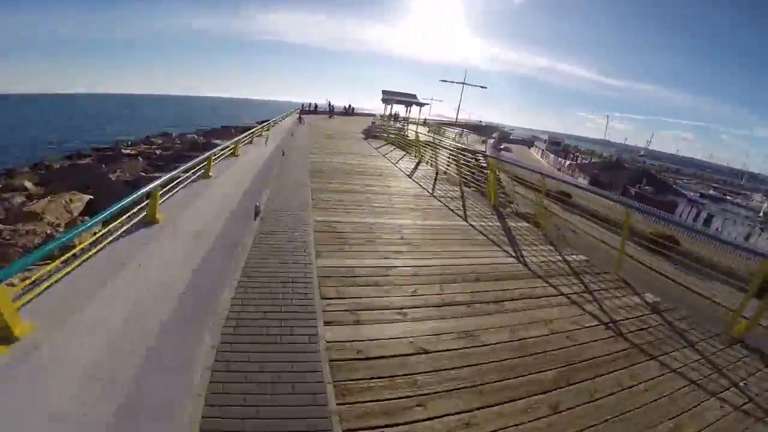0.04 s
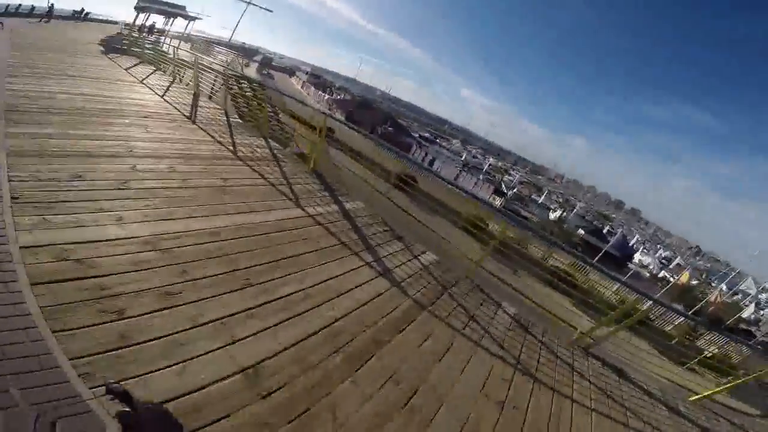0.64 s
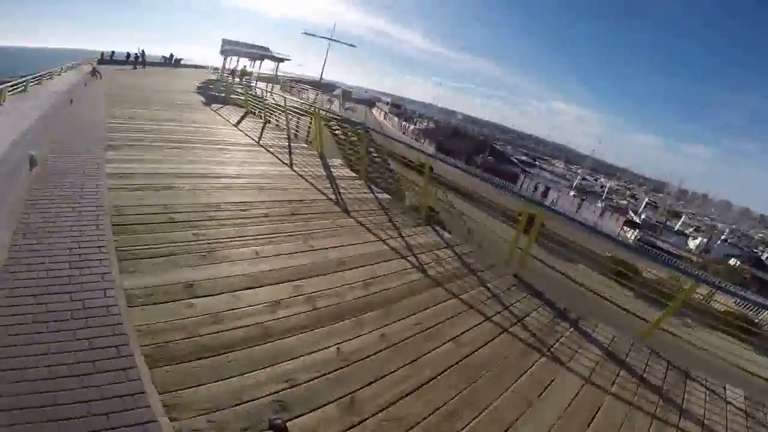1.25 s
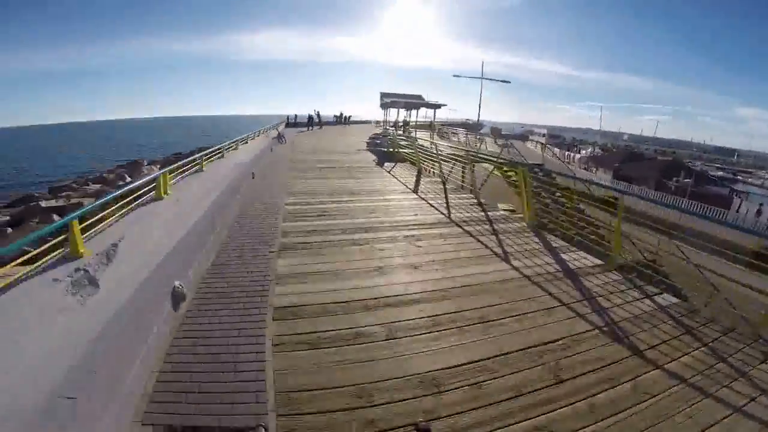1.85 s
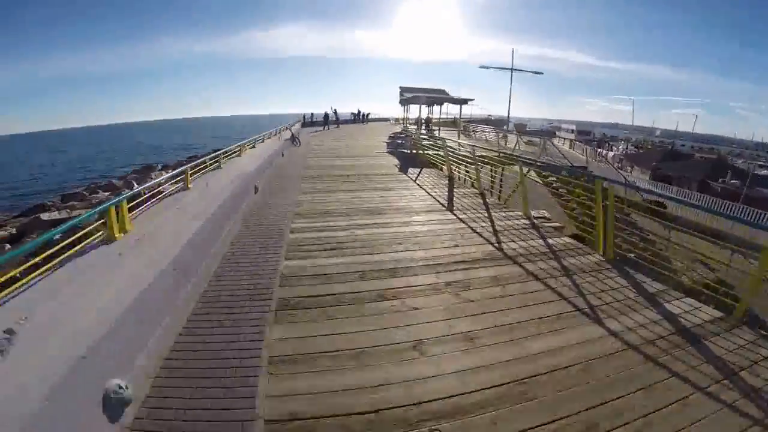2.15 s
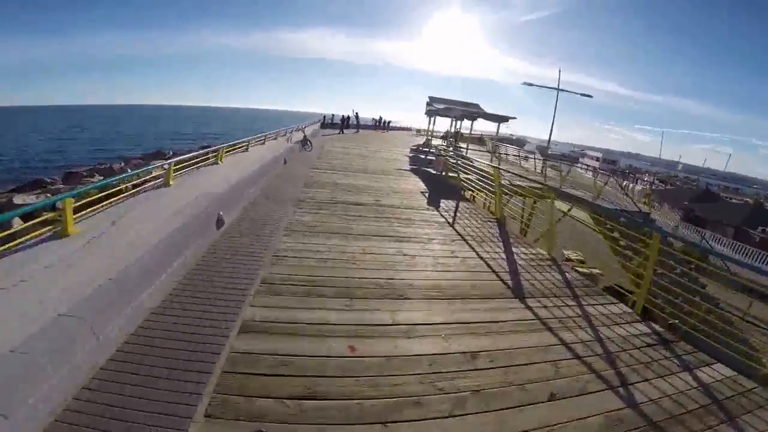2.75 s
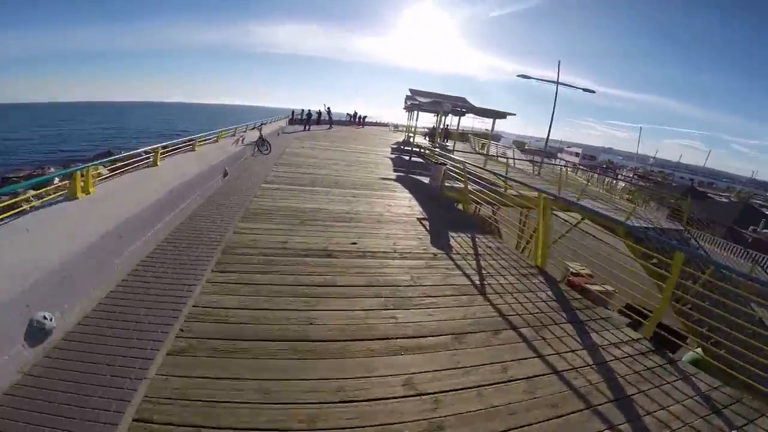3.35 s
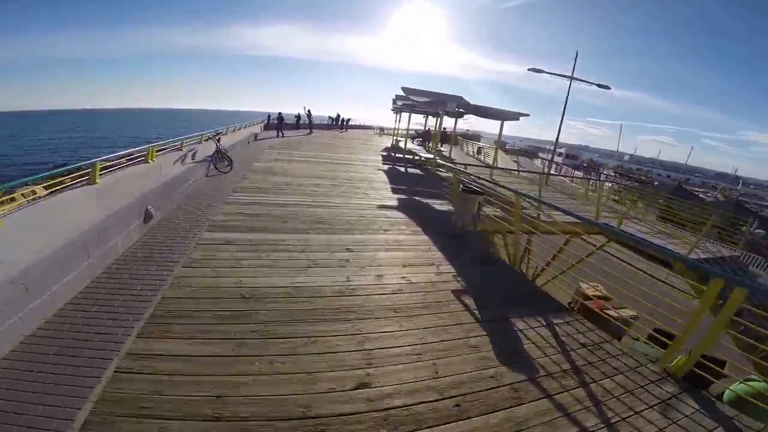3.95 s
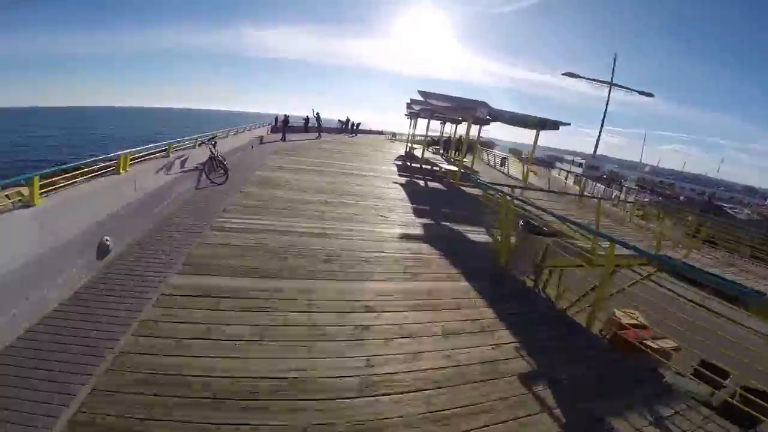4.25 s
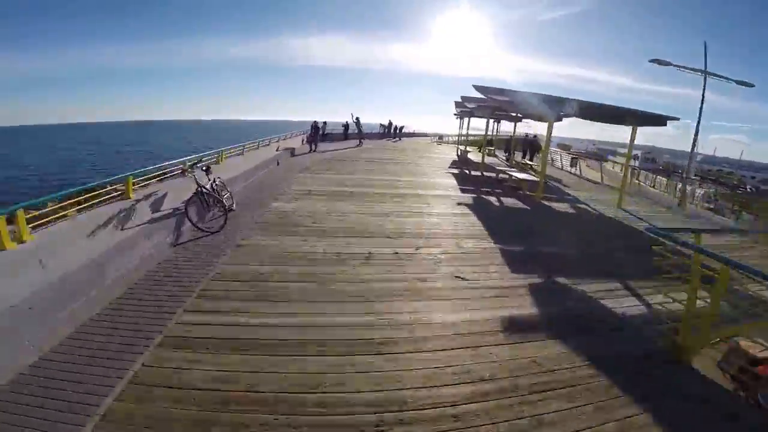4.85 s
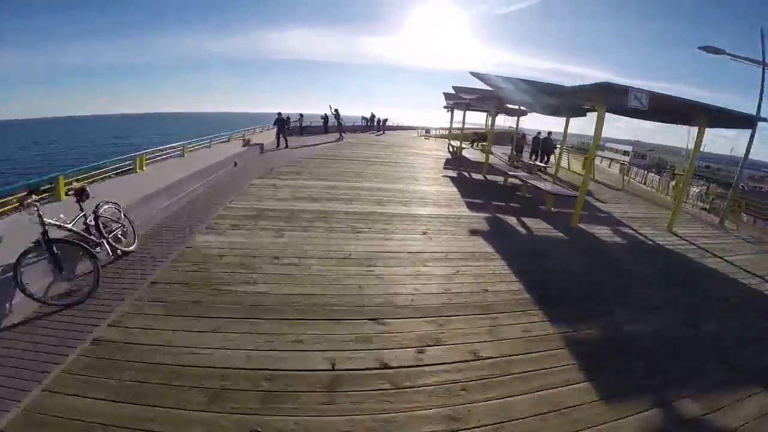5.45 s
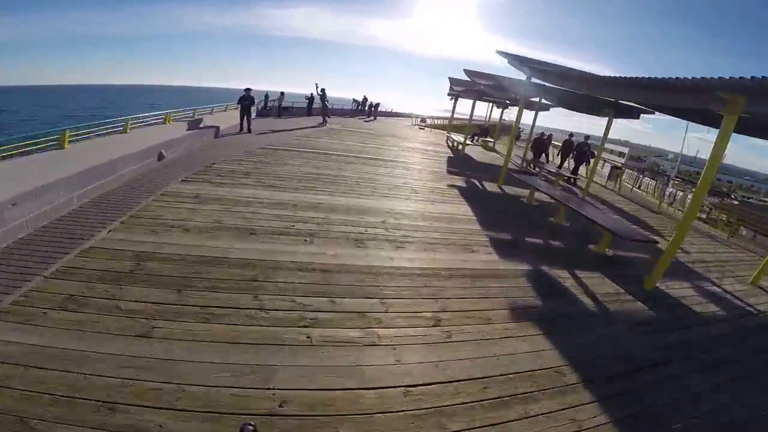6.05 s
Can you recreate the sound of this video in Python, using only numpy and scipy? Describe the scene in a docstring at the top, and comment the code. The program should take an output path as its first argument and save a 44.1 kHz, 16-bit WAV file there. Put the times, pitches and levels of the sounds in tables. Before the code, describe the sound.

Bicycle tyres rumble and clatter over wooden boardwalk planks while wind thumps on the microphone, with small metallic ticks.

```python
"""Wind thumps on the microphone while bicycle tyres drum over the joints of a seaside boardwalk.
The microphone is on a small camera riding with the bicycle: close up, open air, no echo.
The tread fizzes on the wood as the bicycle leans, loose planks clatter, the deck thuds on its joists,
and the chain and fittings tick and squeak. Underneath lie the camera's own hiss and faint whine."""
import sys
import numpy as np
from scipy import signal
from scipy.fft import rfft, irfft, next_fast_len
from scipy.io import wavfile
from scipy.ndimage import uniform_filter1d

SR = 44100
rng = np.random.default_rng(int(sys.argv[2]) if len(sys.argv) > 2 else 0)


def materialize(psi):
    """Save the field psi as 16-bit PCM at rate SR to the path in sys.argv[1].

    A 1-D psi becomes a single channel; in a 2-D psi each row is a channel.
    """
    bounded = np.clip(np.atleast_2d(psi).T, -1, 1)
    quanta = np.round(bounded * 32767).astype(np.int16)
    wavfile.write(sys.argv[1], SR, quanta)


N = 273420

# The ring of one plank. Each row: frequency in Hz, relative level in dB, t60 in seconds.
PLANK_RING = [(327, 9, 0.022), (482, -1.5, 0.12), (740, -12.5, 0.093), (882, -4, 0.11), (975, 7.5, 0.013),
              (1340, 0, 0.012), (1487, 0, 0.047), (1713, -8, 0.071), (2475, 9.5, 0.023), (2790, 14.5, 0.01)]
# How hard the tyres rub on the wood. Each row: time in seconds, strength in dB.
TYRE_RUB = [(0.0, -62), (0.62, -58.5), (0.72, -60.5), (1.0, -50.5), (1.88, -46), (2.02, -54.5), (2.2, -48),
            (2.52, -52.5), (2.66, -66.5), (3.52, -62), (4.04, -68), (4.2, -51.5), (4.88, -47.5),
            (5.24, -52), (5.32, -62.5), (5.38, -56.5), (6.18, -53.5)]
MID_RUB_DB = -50.5  # a middling rub


def rolling(rub_db, joints_per_s=23):
    """Both wheels drop into the unevenly spaced joints; the grain of the wood roars in between."""
    # Roughness of the deck under the wheels. Each row: time in seconds, strength in dB.
    roughness = [(0.0, -58.0), (0.86, -63), (1.88, -49.0), (2.24, -45), (2.38, -42.5), (2.62, -58.5),
                 (3.96, -48.0), (4.86, -53.0), (4.98, -48), (5.8, -55), (5.9, -48.5), (6.0, -63.5),
                 (6.18, -47)]
    # The deck's boom. Each row: frequency in Hz, relative level in dB, t60 in seconds.
    deck_modes = [(117.8, -2.5, 0.093), (147.5, 0.5, 0.084), (188.6, 1.5, 0.055), (265.5, -6.5, 0.065),
                  (322, -7, 0.046), (408, -2.5, 0.033), (476, -7.5, 0.049)]
    # Spectrum of the roar. Each row: frequency in Hz, relative level in dB.
    roar_spectrum = [(70, -10), (130, -3.5), (300, 6.5), (480, 2.5), (620, 2), (900, -5.5), (1200, -3.5),
                     (1700, -1.5), (3000, -10.5), (14000, -50)]
    deck_db, mid_deck_db = in_time(roughness), -55.5
    joints = np.zeros(N)
    for wheel in range(2):
        joint_rate = joints_per_s * from_db(1.5 * drift(17))
        passed = np.floor(np.cumsum(joint_rate) / SR + rng.random())
        joints += np.diff(passed, prepend=passed[0]) * from_db(2 * rng.standard_normal(N))
    boom = rms_one(body(rms_one(joints) + 1.7 * grains(2500), deck_modes))
    jolt = rms_one(signal.lfilter([1], [1, -np.exp(-1 / (0.0062 * SR))], joints))  # 6.2 ms decay
    contact = grains(6000) * (1 + 0.31 * jolt)
    roar = rms_one(coloured(contact, roar_spectrum) + 0.22 * rms_one(body(contact, PLANK_RING)))
    roar_db = -55 + 0.3 * (deck_db - mid_deck_db) + 0.4 * (rub_db - MID_RUB_DB)
    return from_db(deck_db + 1) * boom + from_db(roar_db) * roar


def tread_fizz(rub_db):
    """Rubber knobs snap off the wood in a fizz that brightens as it grows."""
    # Spectrum of the fizz. Each row: frequency in Hz, relative level in dB.
    fizz_spectrum = [(1200, -47), (1950, -7.5), (2280, 3.5), (2480, 1), (2680, 4.5), (2950, -0.5),
                     (3250, -12), (3450, -7.5), (3720, -11), (4050, -30.5), (5800, -30.5), (14000, -80)]
    rub_gain = from_db(rub_db - 1 + 1.27 * drift(20))
    fizz_db = 20 * np.log10(np.hypot(rub_gain, scuff_gain()))
    snaps = grains(3500) * from_db(2.03 * drift(70))
    fizz = coloured(snaps, fizz_spectrum)
    dull = signal.sosfiltfilt(signal.butter(8, 3200, fs=SR, output="sos"), fizz)
    treble_gain = from_db(0.14 * (fizz_db - MID_RUB_DB))
    return from_db(fizz_db) * (dull + treble_gain * (fizz - dull))


def scuff_gain(attack_s=0.006, release_s=0.0056):
    """Each sideways scuff bites quickly, holds while the tread slips and lets go."""
    # Each row: start in seconds, length in seconds, fizz level in dB.
    scuffs = [(0.347, .045, -51.5), (0.506, 0.14, -60), (1.081, 0.047, -48), (1.326, 0.23, -42.5),
              (2.812, 0.089, -59), (3.042, 0.081, -55.5), (4.378, 0.11, -44.5), (4.504, 0.1, -43.5),
              (4.765, 0.056, -45.5), (5.385, 0.085, -52.5), (5.694, 0.18, -60)]
    t, gain = clock(), np.zeros(N)
    for s, length, db in scuffs:
        bite = np.clip((t - s) / attack_s, 0, 1)
        release = np.exp(-np.maximum(t - s - length, 0) / release_s)
        gain += from_db(db) * bite * release
    return gain


def tread_swish(rub_db):
    """Air swishes out of the tread, growing with the rub more slowly than the fizz does."""
    # Spectrum of the swish. Each row: frequency in Hz, relative level in dB.
    swish_spectrum = [(600, -34), (1200, -6), (1500, 2), (1800, -1), (2100, -2.5), (2800, -6), (3300, -28),
                      (5000, -41), (5700, -17), (7000, -39), (14000, -46)]
    swish_db = -55.5 + 0.79 * (rub_db - MID_RUB_DB)
    return from_db(swish_db) * coloured(grains(6000), swish_spectrum)


def loose_planks(mid_blow_db=-42.5, db_per_octave=15):
    """A loose plank takes one blow, then chatters against its nails, dulling as it settles."""
    # A wheel hits a plank. Each row: start in seconds, strength in dB, chatter t60 in seconds.
    blows = [(.304, -50, 0.03), (1.57, -46, 0.2), (1.625, -43.5, 0.2), (1.67, -42, 0.21),
             (1.828, -44.5, 0.2), (1.884, -41, 0.14), (1.929, -38, 0.27), (2.051, -36, 0.19),
             (2.103, -26.5, 0.088), (2.199, -42, 0.21), (2.309, -35.5, 0.092), (2.359, -28.5, 0.11),
             (3.105, -49.5, 0.11), (3.32, -51, 0.38), (3.361, -43.5, 0.095), (3.469, -46, 0.076),
             (3.598, -45.5, 0.17), (3.619, -43.5, 0.067), (3.729, -43.5, 0.12), (3.858, -48, 0.3),
             (3.882, -40, 0.057), (3.935, -42, 0.067), (4.129, -45, 0.065), (5.038, -48, 0.059),
             (5.244, -43.5, 0.058), (5.457, -46, 0.091), (5.505, -42.5, .065), (5.64, -44, .045)]
    # Spectrum of the clatter. Each row: frequency in Hz, relative level in dB.
    clatter_spectrum = [(90, -35), (170, -6.5), (550, 2), (900, 3.5), (1150, 4.5), (1450, 5), (2000, 2.5),
                        (2800, -11), (3300, -14), (6000, 3), (12000, -42)]
    chatter, force = rms_one(np.tanh(grains(3000) / 3)), np.zeros(N)
    for s, db, t60 in blows:
        bright_hz = 1620 * 2 ** ((db - mid_blow_db) / db_per_octave)  # harder is brighter
        rattle = burst(chatter, s, t60, rise_s=0.0018)
        rattle[0] += 5  # the blow itself
        hard, soft = low_pass(rattle, bright_hz), low_pass(rattle, 0.74 * bright_hz)
        fresh = np.exp(-(np.arange(len(rattle)) / SR / 0.01) ** 2)
        makeup_gain = np.sqrt(SR / 2 / bright_hz)
        add(force, s, from_db(db) * makeup_gain * (fresh * hard + (1 - fresh) * soft))
    wood = rms_one(coloured(force, clatter_spectrum) + 0.76 * rms_one(body(force, PLANK_RING)))
    return from_db(4) * np.std(force) * wood


def deck_thuds():
    """Heavier bumps set one span of the deck booming on its joists at its own pitch."""
    # Each row: start in seconds, pitch in Hz, level in dB.
    thuds = [(1.422, 166, -40.5), (1.945, 162, -33), (2.11, 300, -35.5), (2.206, 161, -35),
             (2.363, 263, -41), (3.097, 199, -36.5), (3.362, 199, -31.5), (4.73, 193, -38),
             (5.235, 159, -36), (5.46, 155, -44.5), (5.82, 186, -36), (6.082, 178.5, -32)]
    out, age = np.zeros(N), np.arange(SR // 4) / SR
    envelope = strike_envelope(age, t60=0.12, rise_s=0.00071)
    for s, hz, db in thuds:
        add(out, s, from_db(db) * envelope * np.sin(2 * np.pi * hz * age))
    return out


def chain_ticks():
    """The chain and fittings give dry, sharp ticks close to the microphone."""
    # Each row: start in seconds, strength in dB, low-pass cutoff in Hz.
    ticks = [(1.0144, -42, 15000), (1.526, -41, 10300), (1.5857, -40.5, 10100), (1.625, -46, 7500),
             (1.8542, -44, 5500), (2.0521, -44, 5800), (2.1014, -41, 7650), (2.222, -47, 15000),
             (2.36, -50, 5800), (3.9374, -49.5, 13000), (4.2416, -46.5, 14000), (5.351, -52, 8000),
             (5.6477, -48.5, 8000)]
    # Spectrum of the fittings. Each row: frequency in Hz, relative level in dB.
    metal_spectrum = [(2000, -15), (4000, 1), (5700, 4.5), (7500, -4.5), (10000, -11.5), (15000, -14)]
    out, metal = np.zeros(N), noise(metal_spectrum)
    for s, db, bright_hz in ticks:
        tick = burst(metal, s, t60=0.014, rise_s=0.0002)
        add(out, s, from_db(db) * low_pass(tick, bright_hz))
    return out


def metal_squeaks():
    """The fittings give tiny squeaks, each a tone made scratchy by its wandering phase."""
    # Each row: centre in seconds, pitch in Hz, peak level in dB.
    squeaks = [(1.59, 5280, -49), (1.857, 5630, -56.5), (2.227, 5640, -52.5), (3.403, 5900, -56),
               (3.608, 6130, -58), (3.664, 5860, -57.5), (4.123, 5600, -53), (4.123, 11050, -59.5),
               (4.18, 6180, -49.5), (4.449, 5770, -54.5)]
    out, age = np.zeros(N), np.arange(SR // 25) / SR - 0.02
    envelope = np.exp(-(age / 0.0074) ** 2)
    for s, hz, db in squeaks:
        scratch = np.cumsum(rng.normal(0, 0.13, len(age)))
        add(out, s + age[0], from_db(db) * envelope * np.sin(2 * np.pi * hz * age + scratch))
    return out


def wind(wake_db=-16, wake_s=0.037):
    """Each eddy piles up pressure, then sucks briefly as it passes the port, with flutter around it."""
    # The head wind. Each row: time in seconds, strength in dB.
    breeze = [(0.0, -43), (1.21, -42.5), (2.31, -35), (2.61, -44), (3.83, -41), (4.25, -41), (4.85, -45),
              (6.2, -42)]
    # Eddies on the microphone. Each row: centre in seconds, strength in dB, half width in seconds.
    eddies = [(0.015, -20.5, 0.005), (0.113, -22.5, 0.0054), (.414, -29, 0.0049), (0.732, -24.5, 0.0056),
              (1.105, -22, 0.0042), (1.159, -22.5, 0.0054), (1.696, -25.5, 0.0059), (1.789, -26.5, 0.0075),
              (2.101, -17, 0.005), (2.257, -10.5, 0.0053), (2.603, -23.5, 0.0048), (2.831, -25.5, .0035),
              (2.894, -24, 0.0065), (3.156, -15.5, .005), (3.273, -22.5, 0.0061), (3.952, -17, 0.0071),
              (4.157, -14.5, 0.0055), (4.2, -17, 0.0042), (4.267, -24, 0.0063), (4.386, -20.5, .0036),
              (4.403, -20.5, 0.0041), (5.648, -25, 0.0026), (5.664, -19, 0.0052), (5.992, -27.5, 0.011)]
    # Spectra of slow sway and fast flutter. Each row: frequency in Hz, relative level in dB.
    sway_spectrum = [(3, -1.5), (11, 9.5), (20, 9), (28, -16), (42, -23), (60, -21), (150, -62),
                     (2000, -120)]
    flutter_spectrum = [(20, -29), (45, 2), (72, -0.5), (95, -11.5), (130, -45), (400, -34), (2000, -110)]
    breeze_db = in_time(breeze)
    pressure = from_db(breeze_db + 3.5) * churn(sway_spectrum)
    flutter_gain = from_db(breeze_db - 2.5 + 2 * drift(16))
    for s, db, width in eddies:
        near = slice(max(int((s - 0.1) * SR), 0), int((s + 0.1) * SR))
        age = clock()[near] - s
        push = 0.4 * np.exp(-((age / width + 2.2) / 3) ** 2)
        suction = 1.15 * np.exp(-(age / width) ** 2)
        pressure[near] += from_db(db) * (push - suction)
        wake = from_db(db + wake_db) * np.exp(-(age / wake_s) ** 2)
        flutter_gain[near] = np.hypot(flutter_gain[near], wake)
    return pressure + flutter_gain * churn(flutter_spectrum)


def churn(spectrum):
    """Restless air pressure whose strength stays even over a few tenths of a second."""
    air = noise(spectrum)
    return air / np.sqrt(uniform_filter1d(air ** 2, size=SR // 5) + 1e-9)


def camera_noise(frames_per_s=30, spurts_per_s=7.3):
    """The electronics hiss, with faint uneven spurts up high; their whine pulses with every frame."""
    # Tones of the whine. Each row: frequency in Hz, rms level in dB.
    tones = [(5846, -81), (8780, -78.5), (11719, -84), (14626, -87)]
    # Spectra of the even hiss and the spurts. Each row: frequency in Hz, relative level in dB.
    hiss_spectrum = [(200, -1), (1000, 8.5), (2800, -6.5), (4200, -5), (4900, -7.5), (5400, -4),
                     (6000, -6.5), (6600, -10.5), (9000, -13.5), (10800, -17.5), (15000, -20.5)]
    spurt_spectrum = [(8000, -50), (9300, -7), (9600, -4), (9900, -6), (11500, -50)]
    t = clock()
    whine = sum(np.sqrt(2) * from_db(db) * np.sin(2 * np.pi * hz * t) for hz, db in tones)
    pulsing = 1 + 0.19 * np.sin(2 * np.pi * frames_per_s * t)
    hiss = from_db(-60) * noise(hiss_spectrum)
    cycles = np.cumsum(spurts_per_s * from_db(2.5 * drift(9))) / SR
    spurts = from_db(-78) * np.sin(np.pi * cycles) ** 4 * noise(spurt_spectrum)
    return hiss + whine * pulsing + spurts


def from_db(db):
    """Decibels to gain."""
    return 10 ** (np.asarray(db) / 20)


def rms_one(x):
    """Scale to unit rms."""
    return x / np.sqrt(np.mean(x ** 2) + 1e-20)


def clock():
    """Time of every sample in seconds."""
    return np.arange(N) / SR


def in_time(curve):
    """The value of a curve at every sample."""
    return np.interp(clock(), *np.transpose(curve))


def coloured(x, spectrum):
    """Give an excitation a spectrum; rms 1."""
    hz, db = np.transpose(spectrum)
    size = next_fast_len(N)
    bins = np.maximum(np.fft.rfftfreq(size, 1 / SR), 1)
    shape = from_db(np.interp(np.log(bins), np.log(hz), db))
    return rms_one(irfft(rfft(x, size) * shape, size)[:N])


def noise(spectrum):
    """Steady noise with a spectrum; rms 1."""
    return coloured(rng.standard_normal(N), spectrum)


def drift(per_s):
    """Slow random wander; rms 1."""
    knots = rng.standard_normal(4096)
    return rms_one(np.interp(clock() * per_s, np.arange(len(knots)), knots))


def grains(per_s):
    """Random tiny impacts of random size; rms 1."""
    return rms_one(rng.standard_normal(N) * (rng.random(N) < per_s / SR))


def ring(force, hz, t60):
    """One mode: a unit click sets a sine of height 1 ringing."""
    r, w = from_db(-60 / (t60 * SR)), 2 * np.pi * hz / SR
    return signal.lfilter([0, np.sin(w)], [1, -2 * r * np.cos(w), r * r], force + 1e-18)


def body(force, modes):
    """All modes of an object driven by one force, alternating in sign."""
    return sum((-1) ** k * from_db(db) * ring(force, hz, t60) for k, (hz, db, t60) in enumerate(modes))


def low_pass(x, hz):
    """Fourth-order Butterworth low-pass."""
    return signal.sosfilt(signal.butter(4, hz, fs=SR, output="sos"), x)


def strike_envelope(age, t60, rise_s):
    """A quick rise, then a fall of 60 dB every t60 seconds."""
    return (1 - np.exp(-age / rise_s)) * np.exp(-np.log(1000) * age / t60)


def burst(source, s, t60, rise_s):
    """The stretch of a source that swells at time s and dies away."""
    part = source[int(s * SR):][:SR // 4]
    return part * strike_envelope(np.arange(len(part)) / SR, t60, rise_s)


def add(out, s, sound):
    """Mix a sound in at time s."""
    span = out[int(s * SR):][:len(sound)]
    span += sound[:len(span)]


def scene():
    """Tyres, boardwalk and fittings from close by, with wind right on the one microphone."""
    rub_db = in_time(TYRE_RUB)
    tyres = rolling(rub_db) + tread_fizz(rub_db) + tread_swish(rub_db)
    boardwalk = loose_planks() + deck_thuds()
    fittings = chain_ticks() + metal_squeaks()
    return (tyres + boardwalk + fittings + wind() + camera_noise())[None]


def record(dry, low_cut_hz=8, top_hz=15100):
    """The camera's microphone passes no steady pressure, and the top is cut steeply."""
    sound = signal.sosfilt(signal.butter(1, low_cut_hz, "high", fs=SR, output="sos"), dry)
    return signal.sosfilt(signal.ellip(10, 0.1, 80, top_hz, fs=SR, output="sos"), sound)


dry = scene()
out = record(dry)
materialize(out)
```